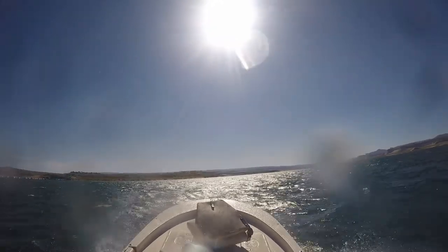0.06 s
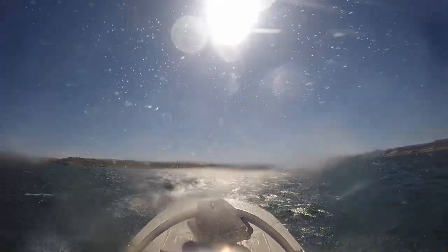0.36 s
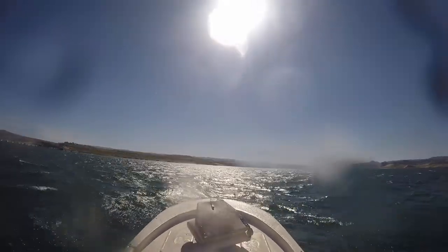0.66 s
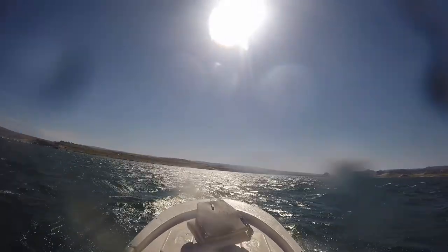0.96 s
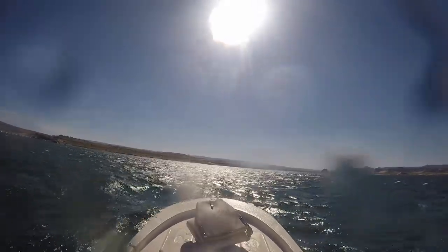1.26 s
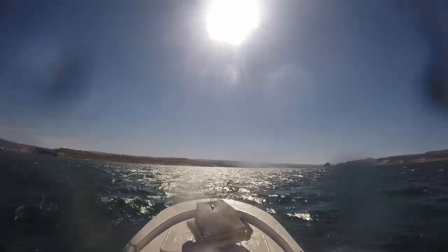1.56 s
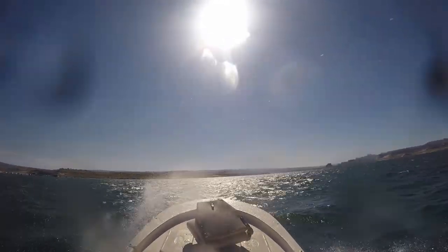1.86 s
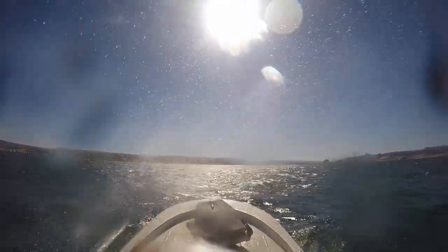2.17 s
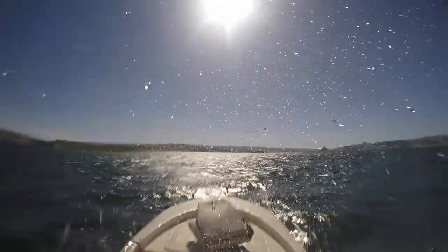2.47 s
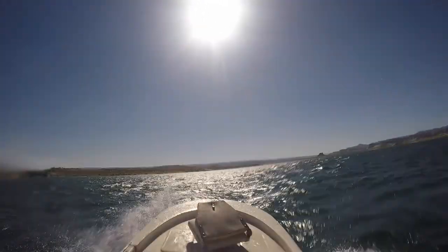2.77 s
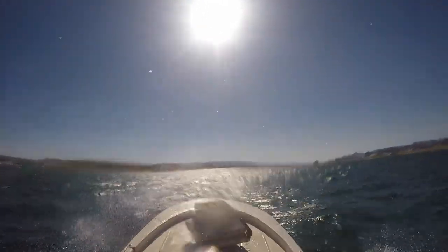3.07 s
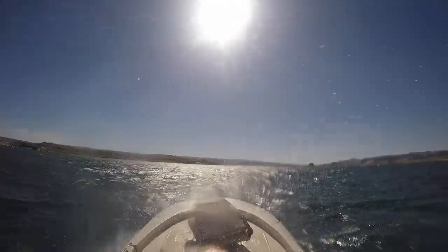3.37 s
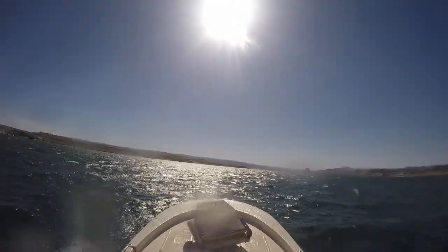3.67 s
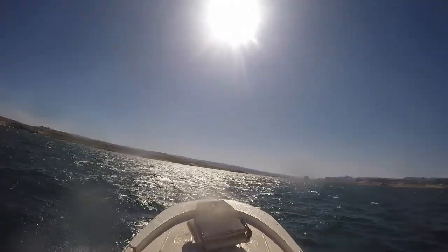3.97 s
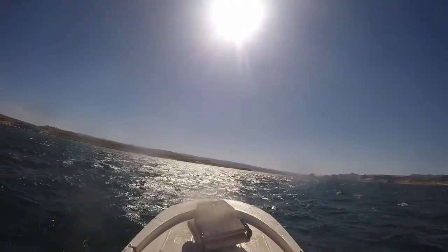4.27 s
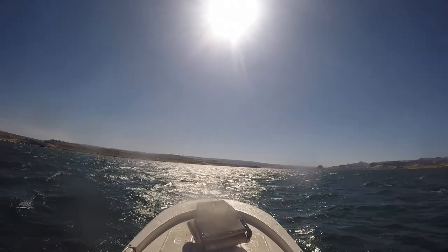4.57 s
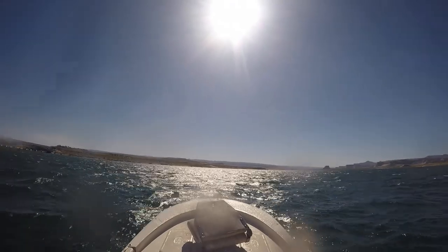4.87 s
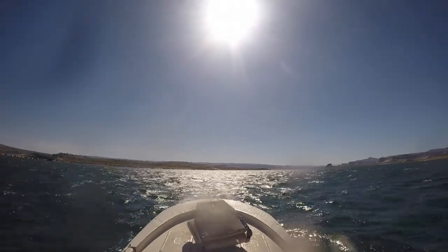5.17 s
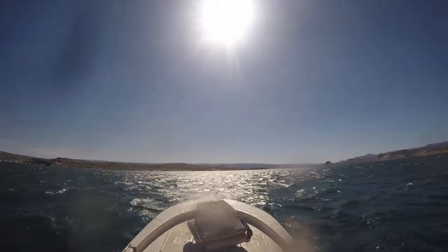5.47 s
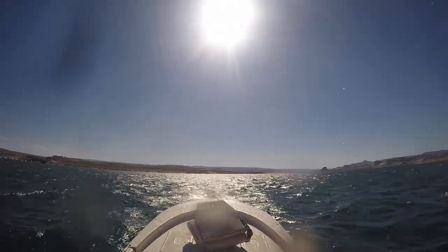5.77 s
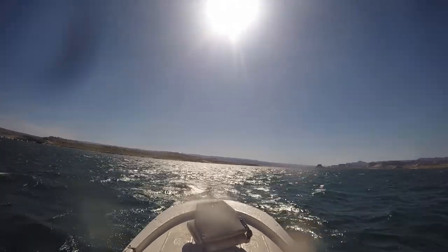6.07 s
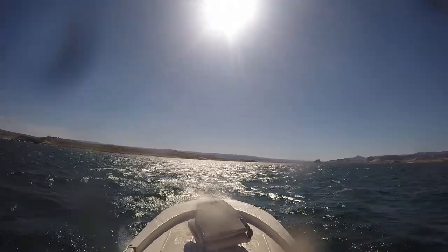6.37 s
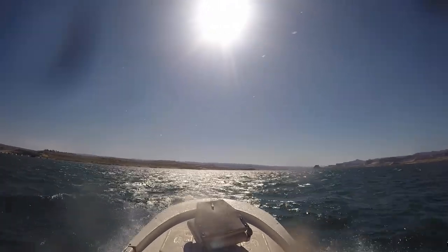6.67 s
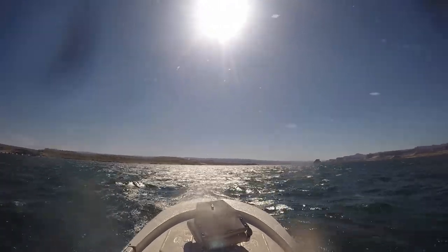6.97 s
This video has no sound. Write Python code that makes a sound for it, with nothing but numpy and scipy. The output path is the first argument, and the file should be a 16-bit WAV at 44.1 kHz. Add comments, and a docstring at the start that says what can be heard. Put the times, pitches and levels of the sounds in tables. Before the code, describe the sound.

Deep thuds of a boat hull hitting waves, with washing water and pattering spray over a low motor hum and rushing wind.

```python
"""Wind and a low engine drone, then at once the first boom: a small motorboat planing over chop.
The microphone rides on board, in a camera housing fixed behind the bow, with the motor astern.
Water laps under the hull and sheets along it, loose fittings knock on the deck, and spray patters
on the housing, right at the microphone. Over it all the hull slams into wave after wave:
the whole shell booms, its bottom panels thud, and buffeting air hisses briefly after each boom."""
import sys
import numpy as np
from scipy import signal
from scipy.fft import rfft, irfft, next_fast_len
from scipy.io import wavfile
from scipy.ndimage import uniform_filter1d, map_coordinates

SR = 44100
rng = np.random.default_rng(int(sys.argv[2]) if len(sys.argv) > 2 else 0)


def output_pcm(signal):
    """Save a mono or channel-first signal as 16-bit PCM at the path in sys.argv[1].

    Samples are clipped to [-1, 1] before scaling.
    """
    pcm = np.clip(np.atleast_2d(signal).T, -1, 1) * 32767
    wavfile.write(sys.argv[1], SR, np.round(pcm).astype(np.int16))


N = 318402
T = np.arange(N) / SR


def amp(db):
    """Decibels to gain."""
    return 10 ** (np.asarray(db) / 20)


def unit(x):
    """Scale to rms 1."""
    return x / np.sqrt(np.mean(x ** 2) + 1e-20)


def curve(rows):
    """Join (time, value) rows into one value per sample."""
    return np.interp(T, *np.transpose(rows))


def wobble(rate):
    """A smooth random curve, rate knots a second."""
    return map_coordinates(rng.standard_normal(int(N * rate / SR) + 4), [T * rate])


def swell(s, hold, attack, release):
    """Gain that rises to 1 at time s, holds and falls; attack and release are seconds per 20 dB."""
    decades_down = np.maximum((s - T) / attack, (T - s - hold) / release)
    return 10 ** -np.clip(decades_down, 0, 10)


def colour(x, spectrum, peaks=()):
    """Causal filter with a smooth spectrum and resonances on top of it."""
    m = 2 * next_fast_len(len(x))
    hz = np.fft.rfftfreq(m, 1 / SR)
    f, level = np.transpose(spectrum)
    db = np.interp(np.log(hz + 1), np.log(f), level)
    db = db + sum(lift / (1 + (2 * (hz - centre) / width) ** 2) for centre, width, lift in peaks)
    cepstrum = irfft(np.log(amp(db)), m)
    cepstrum[1:m // 2] *= 2  # folded for minimum phase
    cepstrum[m // 2 + 1:] = 0
    return irfft(rfft(x, m) * np.exp(rfft(cepstrum)), m)[:len(x)]


def add(track, s, sound):
    """Mix a sound into the track at time s."""
    start = max(0, round(s * SR))
    part = track[start:start + len(sound)]
    part += sound[:len(part)]


def grains(rate, hz, scatter, cycles, spread_db):
    """Droplets or bubbles at random moments, each a tiny ring of its own pitch and size; rms 1."""
    when, pitch_a, pitch_b, weight = rng.random((int(rate * N / SR), 4)).T[:, :, None]
    pitch = np.clip(hz * np.exp(scatter * (pitch_a + pitch_b - 1)), 300, SR / 3)
    size = amp(spread_db * np.minimum(-np.log(1 - weight), np.pi))
    k = np.arange(SR // 200)
    rings = size * np.sin(2 * np.pi * pitch * k / SR) * np.exp(-pitch * k / SR / cycles)
    places = (when * N).astype(int) + k
    return unit(np.bincount(places.ravel(), rings.ravel(), N)[:N])


CALM_DB = -44.5  # airflow at the usual speed
# airflow right at the microphone: (time [s], level [dB])
AIRFLOW = [(0.04, -47), (0.92, -46), (1.15, -44.5), (1.85, -47.5), (3.0, -44.5), (3.75, -45.5), (4.0, -44),
           (4.55, -43), (4.8, -39), (5.05, -40), (5.27, -35), (5.45, -34.5), (5.8, -40.5), (6.2, -42.5),
           (6.55, -48), (7.2, -41.5)]
# spectrum of air rushing over the housing: (frequency [Hz], level [dB])
AIR_SPECTRUM = [(160, -25.5), (280, 0), (393, -7), (524, -1), (580, -8), (698, -6), (1280, 0.5), (1860, -7),
                (2530, -8), (4060, -18), (4890, -14), (5990, -23.5), (10100, -38.5), (14700, -43),
                (16000, -42)]
# cavities of the microphone port: (frequency [Hz], width [Hz], lift [dB])
PORT_MODES = [(208, 44, 4.6), (528, 210, 1.8), (880, 130, 3.6), (1280, 32, 2.1), (2100, 57, 4.8),
              (2504, 420, 6.2), (3560, 140, 5.9), (4890, 70, 5.3), (10160, 1400, 13.2)]


def wind(gust_db=0.75, flicker_db=0.97):
    """Air rushes over the housing and sounds the cavities of the microphone port."""
    rush = unit(colour(rng.standard_normal(N), AIR_SPECTRUM, PORT_MODES))
    return amp(curve(AIRFLOW) + gust_db * wobble(13) + flicker_db * wobble(70)) * rush


# harmonics of the motor, heard from the bow: (multiple of the firing rate, level [dB])
MOTOR_ORDERS = [(1, 7), (2, 2.5), (4, 1), (10, -8.5)]


def engine(firing_hz=53.37, db=-49, load_db=-1, rebound_db=-13, drift=0.00805, flutter=0.0263):
    """Astern, the motor wavers, labours in chop and into waves, and runs light on the rebound."""
    firing = firing_hz * (1 + drift * wobble(5) + flutter * wobble(45))
    phase = 2 * np.pi * np.cumsum(firing) / SR
    drone = sum(amp(level + 3 * wobble(10)) * np.sqrt(2) * np.sin(k * phase)
                for k, level in MOTOR_ORDERS)
    chop_db, speed_db = curve(CHOP), curve(AIRFLOW) - CALM_DB
    cruise_db = db + 0.52 * (chop_db - chop_db.mean()) + 0.24 * speed_db + rebound_db * rebound()
    ploughing = sum(swell(s, 0, rise, fall / 2) for s, _, rise, fall, _ in BOW_WAVES)
    return amp(cruise_db) * (1 + amp(load_db) * ploughing) * drone


# how hard small chop rattles the hull underfoot: (time [s], level [dB])
CHOP = [(0.0, -40.5), (0.35, -32), (0.95, -37.5), (1.25, -29.5), (1.9, -41), (2.1, -33.5), (2.3, -23.5),
        (2.7, -40), (3.1, -40.5), (3.7, -33), (3.95, -32), (4.35, -34.5), (4.9, -30), (5.27, -23.5),
        (5.55, -40.5), (6.15, -32), (6.6, -43.5), (7.05, -28.5)]
# spectrum of the hull's deep sway: (frequency [Hz], level [dB])
SWAY_SPECTRUM = [(10, -39), (21, -13.5), (27, 0), (34, -11), (47, 2), (57, -16), (85, -56), (200, -75.5)]
# spectrum of its rumbling panels: (frequency [Hz], level [dB])
RUMBLE_SPECTRUM = [(45, -44), (72, 11.5), (85, -2.5), (108, -0.5), (135, -4.5), (170, -18.5), (220, -15.5),
                   (270, -27.5), (400, -45), (900, -68)]


def hull_shake(sway_db=-27.5, sway_growth=1.1, rebound_db=-10, heave_lead_s=0.16, heave_trail_s=0.24):
    """The hull sways more with speed and heaves in waves; chop rumbles it, less on the rebound."""
    sway = colour(rng.standard_normal(N), SWAY_SPECTRUM)
    sway_power = np.abs(uniform_filter1d(sway ** 2, size=4000))
    sway = unit(sway / np.sqrt(sway_power + 1e-9))  # an even rocking
    rumble = unit(colour(rng.standard_normal(N), RUMBLE_SPECTRUM))
    heave = sum(amp(heave_db) * swell(s, 0, heave_lead_s, heave_trail_s)
                for s, *_, heave_db in BOW_WAVES)
    sway_gain = amp(sway_db + sway_growth * (curve(AIRFLOW) - CALM_DB)) + heave
    return sway_gain * sway + amp(curve(CHOP) + rebound_db * rebound()) * rumble


# spectrum of water on the hull, heard from on board: (frequency [Hz], level [dB])
WATER_SPECTRUM = [(150, -23), (250, -2), (350, -1.5), (700, -6.5), (1000, -4), (1500, -3), (2400, -4),
                  (3100, -14.5), (5000, -32), (8000, -32), (15000, -27)]
# resonances of the hollow hull: (frequency [Hz], width [Hz], lift [dB])
HOLLOW_MODES = [(515, 93, 12.1), (950, 190, 13.1), (1510, 520, 6.7), (2170, 450, 15)]


def sloshing(gurgle=3.5):
    """Bubbles and churning water, heard through the hollow hull; rms 1."""
    bubbles = grains(rate=700, hz=1200, scatter=1.2, cycles=2.5, spread_db=3)
    return unit(colour(gurgle * bubbles + rng.standard_normal(N), WATER_SPECTRUM, HOLLOW_MODES))


# small waves under the hull: (time [s], level [dB], length [s], gulp pitch [Hz])
LAPS = [(0.109, -32, 0.013, 940), (0.175, -36.5, 0.0096, 880), (0.632, -36.5, 0.092, 1500),
        (1.765, -37, 0.0062, 2150), (1.95, -42, 0.067, 950), (2.006, -40, 0.0027, 970),
        (2.097, -34, 0.016, 935), (2.244, -28.5, 0.015, 910), (2.617, -37, 0.013, 990),
        (2.768, -35.5, 0.014, 950), (2.805, -35, 0.018, 2070), (2.851, -33.5, 0.1, 960),
        (3.531, -36.5, 0.082, 950), (6.019, -36, 0.057, 960), (6.051, -36, 0.019, 950),
        (6.387, -39, 0.033, 2100)]


def laps(slosh_db=-2.5, attack_s=0.0097, release_s=0.013, gulp_db=6, gulp_rise_s=0.0038, gulp_t60=0.068):
    """Below the microphone, each lap rings a pocket of trapped air and sloshes for a moment."""
    lapping = sum(amp(level) * swell(s + attack_s / 2, length, attack_s, release_s)
                  for s, level, length, _ in LAPS)
    out = amp(slosh_db) * sloshing() * lapping
    t, waver = np.arange(SR // 10) / SR, 0.06 * wobble(400)
    envelope = (1 - np.exp(-t / gulp_rise_s)) * amp(-60 * t / gulp_t60)
    for s, level, _, hz in LAPS:
        pitch = hz * (1 + waver[round(s * SR):][:len(t)])
        gulp = np.sin(2 * np.pi * np.cumsum(pitch) / SR) * envelope
        add(out, s, amp(level + gulp_db) * gulp)
    return out


# the bow ploughs into waves just ahead of the microphone:
# (time [s], water level [dB], rise [s per 20 dB], fall [s per 20 dB], heave level [dB])
BOW_WAVES = [(0.449, -29.5, 0.27, 0.45, -8.5), (1.368, -24.5, 0.093, 0.064, -19),
             (1.685, -28, 0.12, 0.07, -22.5), (2.39, -26, 0.22, 0.35, -14.5),
             (3.214, -25, 0.096, 0.38, -46), (4.14, -29.5, 0.065, 0.039, -44),
             (6.304, -26, 0.11, 0.055, -22.5), (7.104, -25, 0.17, 0.2, -17.5)]
# resonances of the deck under hard blows: (frequency [Hz], width [Hz], lift [dB])
DECK_MODES = [(497, 100, 8.5), (950, 770, 8.5), (1500, 210, 6.5), (2190, 460, 9)]


def wash(db=-3, flutter_db=0.5, hard_db=-33):
    """Hard sheets of water drum broadly on the deck; as they thin out they gurgle."""
    flow = sum(amp(level) * swell(s, 0, rise, fall) for s, level, rise, fall, _ in BOW_WAVES)
    hardness = flow ** 2 / (flow ** 2 + amp(hard_db) ** 2)
    drumming = unit(colour(rng.standard_normal(N), WATER_SPECTRUM, DECK_MODES))
    gain = flow * amp(db + flutter_db * wobble(60))
    return gain * (np.sqrt(hardness) * drumming + np.sqrt(1 - hardness) * sloshing())


# hard little wave slaps and loose fittings around the deck: (time [s], level [dB], ring pitch [Hz])
KNOCKS = [(0.452, -15.5, 1500), (0.548, -20, 2420), (0.667, -23, 2170), (1.357, -18.5, 2320),
          (1.377, -17, 921), (1.686, -15.5, 1600), (1.692, -16.5, 2250), (2.385, -15.5, 1500),
          (3.184, -20.5, 910), (3.218, -13.5, 830), (3.227, -9.5, 2280), (3.256, -14, 2040),
          (3.388, -16.5, 1820), (4.119, -20, 796), (5.647, -13.5, 2100), (6.304, -17, 1500),
          (7.102, -13.5, 1060), (7.112, -10.5, 930)]


def knocks(db=1, ring_db=9, ring_width_hz=350, chatter_t60=0.026, delay_s=0.00111):
    """Each knock strikes the deck and chatters briefly at its own pitch."""
    out, t = np.zeros(N), np.arange(SR // 10) / SR
    for s, level, hz in KNOCKS:
        contact = (t == 0) + 0.5 * rng.standard_normal(len(t)) * amp(-60 * t / chatter_t60)
        knock = colour(contact, WATER_SPECTRUM, DECK_MODES + [(hz, ring_width_hz, ring_db)])
        add(out, s + delay_s, amp(level + db) * knock / np.abs(knock).max())
    return out


# showers landing on the housing, right at the microphone:
# (time [s], length [s], coarse drop level [dB], mist level [dB], growth from start to end [dB])
SHOWERS = [(0.266, 0.275, -29.5, -34.5, 11), (2.033, 0.12, -39, -41, 14.5), (2.334, 0.14, -25.5, -36, 3),
           (3.215, 0.115, -33.5, -40.5, 3.5), (6.93, 0.19, -47.5, -54, -4.5)]
# spectrum of a drop's splat: (frequency [Hz], level [dB])
SPLAT_SPECTRUM = [(300, -18), (900, -16.5), (1900, 0), (2600, 4), (3200, -1), (4200, 2), (5400, -4.5),
                  (6600, -6), (8000, -14.5), (12000, -19.5), (16000, -30)]
# spectrum of fine mist and air hiss: (frequency [Hz], level [dB])
MIST_SPECTRUM = [(300, -42), (900, 8), (2000, 3), (2800, 1), (4400, 2), (5400, -3), (6600, -3),
                 (8000, -7.5), (10000, -6.5), (12500, -6.5), (16000, -6)]
# resonances of the housing: (frequency [Hz], width [Hz], lift [dB])
HOUSING_MODES = [(2507, 310, 7.9), (2850, 130, 6), (3700, 340, 3.3), (4200, 640, 2), (4800, 360, 0.57),
                 (6670, 800, 3.4)]


def spray(patter_db=1, mist_db=6.5, hiss=0.47, clump_db=1.7):
    """Coarse drops ring the housing and fine ones sizzle on it, in clumps; the mist ends first."""
    coarse, fine = np.zeros(N), np.zeros(N)
    for s, length, coarse_db, fine_db, growth_db in SHOWERS:
        build_db = growth_db * (np.clip((T - s) / length, 0, 1) - 1)
        coarse += amp(coarse_db + build_db) * swell(s, length, attack=0.08, release=0.074)
        fine += amp(fine_db + build_db) * swell(s, length, attack=0.08, release=0.043)
    droplets = grains(rate=850, hz=3300, scatter=0.9, cycles=1.8, spread_db=4.2)
    patter = unit(colour(droplets, SPLAT_SPECTRUM, HOUSING_MODES))
    mist = grains(rate=2100, hz=7530, scatter=0.78, cycles=1.0, spread_db=5.0)
    sizzle = unit(colour(mist + hiss * rng.standard_normal(N), MIST_SPECTRUM, HOUSING_MODES))
    shower = coarse * amp(patter_db) * patter + fine * amp(mist_db) * sizzle
    return shower * amp(clump_db * wobble(90))


def stray_drops(count=14, scatter_s=0.14, db=-29, fade_db_per_s=17):
    """Small bright drops around each shower, weaker farther from its middle; rows like BIG_DROPS."""
    rows = []
    for s, length, *_ in SHOWERS:
        for when, size, brightness in rng.standard_normal((count, 3)):
            offset_s = scatter_s * when
            level = db - fade_db_per_s * abs(offset_s) + 1.5 * size
            rows.append((s + length / 2 + offset_s, level, 7 + 3 * brightness))
    return rows


# big single drops on the housing: (time [s], level [dB], treble tilt [dB per octave])
BIG_DROPS = [(0.0275, -33.5, 8.5), (0.4396, -9, 3), (0.5326, -17, 13), (0.5385, -8, 0), (0.547, -6, 0.5),
             (0.5635, -12.5, -2), (0.5938, -16, 6), (0.6031, -9, -5), (0.634, -16.5, 5.5), (0.7108, -32, 7),
             (1.9562, -28, 8.5), (2.1937, -17.5, 3), (2.297, -12.5, 5), (2.3082, -10, -1), (2.3245, -7, -1),
             (2.4307, -11.5, 2), (2.4732, -8.5, -7), (2.543, -11.5, -6.5), (2.5482, -17.5, 5.5),
             (2.601, -8.5, -2.5), (2.6475, -25.5, -6), (2.7142, -20.5, -8), (3.1448, -22.5, 5),
             (3.1681, -25.5, 9), (3.304, -15.5, -2), (3.3877, -13.5, -5), (3.504, -26.5, 3), (3.58, -27, 6),
             (3.8188, -29, 1.5), (4.1, -29, 4), (4.255, -24.5, -11), (4.7032, -29, 4), (4.744, -22.5, -1.5),
             (4.787, -20.5, -9), (5.647, -9, -10.5), (5.9, -27, 9.5), (6.713, -33, 5), (6.845, -22, 2.5),
             (7.0206, -15.5, 3), (7.056, -17, 3), (7.0926, -18.5, -2)]


def drops(splat_t60=0.01, ring_hz=2450, ring_t60=0.017, tilt_hz=1900, spot_db=3.5, delay_s=0.000912):
    """Right at the microphone, each drop is a sharp tick, a short splat and a brief ring."""
    out, t = np.zeros(N), np.arange(SR // 20) / SR
    for s, peak_db, tilt in BIG_DROPS + stray_drops():
        splat = 0.82 * rng.standard_normal(len(t)) * amp(-60 * t / splat_t60)
        ring = 0.019 * np.sin(2 * np.pi * ring_hz * t) * amp(-60 * t / ring_t60)
        spectrum = [(f, level + tilt * np.log2(max(f / tilt_hz, 1))) for f, level in SPLAT_SPECTRUM]
        # each spot on the housing favours other modes
        modes = [(f, width, lift + spot_db * rng.normal()) for f, width, lift in HOUSING_MODES]
        tick = colour((t == 0) + splat + ring, spectrum, modes)
        add(out, s + delay_s, amp(peak_db) * tick / np.abs(tick).max())
    return out


# the hull meets a wave beneath the microphone:
# (time [s], boom level [dB], centre pitch [Hz], panel level [dB], boom decay [s per 60 dB])
SLAMS = [(0.421, 3, 41.7, -13, 0.22), (0.794, -1, 33.8, -23, 0.6), (1.326, 6.5, 35.4, -20, 0.12),
         (1.367, -1, 26.05, -21, 0.58), (1.662, 0.5, 33.1, -17, 0.54), (2.263, -12.5, 24.2, -17, 0.99),
         (2.348, 2.5, 38.7, -11, 0.36), (3.211, -0.5, 37.1, -4.5, 0.83), (3.599, -4.5, 33.5, -23.5, 0.94),
         (4.113, 2.5, 34.3, -25.5, 0.36), (4.48, -5, 36.7, -50, 0.94), (4.68, -1, 32.8, -35, 0.67),
         (4.998, -1.5, 35, -30, 0.4), (5.375, 3.5, 24.3, -29, 0.34), (5.631, 2, 26.7, -23, 0.56),
         (6.071, -4, 41.8, -17.5, 0.69), (6.271, 5, 31.2, -15, 0.34), (7.068, 2, 40.7, -19, 0.4)]
# modes of the hull's bottom panels: (frequency [Hz], level [dB])
PANEL_MODES = [(78, -4.5), (102, 1.5), (120, -1), (137, -13), (165, -7.5), (195, -14.5), (228, -14)]
# spectrum of the wave crashing on them: (frequency [Hz], level [dB])
CRASH_SPECTRUM = [(120, -4), (220, 2.5), (330, -4), (450, 6), (560, 5), (680, 1), (950, 5.5), (1500, -5.5),
                  (2300, -15), (3200, -25), (6000, -34), (15000, -54)]


def slams(rise_s=0.01, boom_db=-1.5, sag=0.17, sag_s=0.034, thud_db=6, thud_t60=0.13,
          crash_db=-12, crash_t60=0.21, buffet_db=-52, buffet_rise_s=0.047):
    """Each wave sets the whole hull booming and thumps its panels; a brief hiss of air follows."""
    out, t = np.zeros(N), np.arange(SR // 2) / SR
    attack = 1 - np.exp(-t / rise_s)
    for s, db, hz, panel_db, t60 in SLAMS:
        # the boom sags in pitch as the hull sinks in and carries more water
        pitch = hz * (1 + sag * (2 * np.exp(-t / sag_s) - 1))
        boom = np.sin(2 * np.pi * np.cumsum(pitch) / SR) * amp(-60 * t / t60) * attack
        panels = sum(amp(level) * np.sin(2 * np.pi * f * (1 + 0.042 * rng.normal()) * t)
                     for f, level in PANEL_MODES)
        thud = panels * amp(-60 * t / thud_t60) * attack
        water = unit(colour(rng.standard_normal(len(t)), CRASH_SPECTRUM))
        crash = water * amp(-60 * t / crash_t60) * attack
        # buffeting air hisses a moment after the blow
        hiss = unit(colour(rng.standard_normal(len(t)), MIST_SPECTRUM))
        buffet = hiss * (t / buffet_rise_s * np.exp(1 - t / buffet_rise_s)) ** 2
        add(out, s, amp(db) * (amp(boom_db) * boom + amp(buffet_db) * buffet))
        add(out, s, amp(panel_db) * (amp(thud_db) * thud + amp(crash_db) * crash))
    return out


def rebound(after_s=0.26, width_s=0.13, half_lift_db=-16.5):
    """0 on the water, towards 1 while the hull rides light after a hard slam."""
    lift = sum(amp(panel_db - half_lift_db) * np.exp(-((T - s - after_s) / width_s) ** 2)
               for s, _, _, panel_db, _ in SLAMS)
    return lift / (1 + lift)


def scene():
    """Hull, water, air and motor at one microphone behind the bow."""
    return (slams() + hull_shake() + wash() + laps() + knocks() + spray() + drops()
            + wind() + engine())[None]


def record(dry):
    """The camera blocks the deepest sway, rounds off the highest peaks and cuts the top treble."""
    low_cut_hz, top_hz = 5, 15600
    passed = signal.sosfilt(signal.butter(1, low_cut_hz, "high", fs=SR, output="sos"), dry)
    limited = passed / (1 + np.abs(passed) ** 8) ** (1 / 8)
    m = next_fast_len(N + SR)
    in_band = np.fft.rfftfreq(m, 1 / SR) < top_hz
    return irfft(rfft(limited, m) * in_band, m)[..., :N]


dry = scene()
out = record(dry)
output_pcm(out)
```